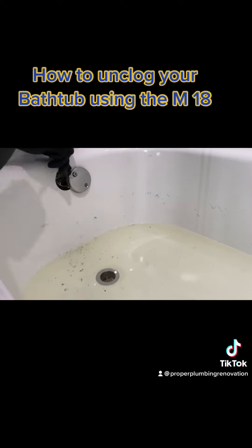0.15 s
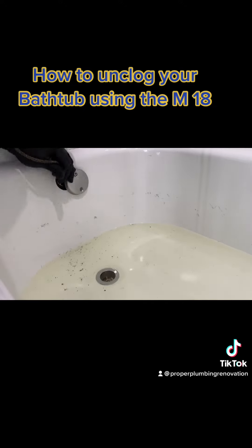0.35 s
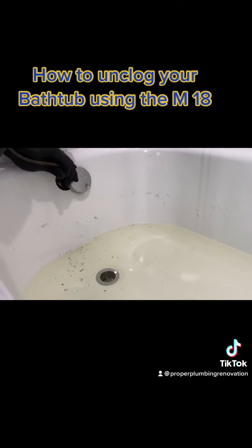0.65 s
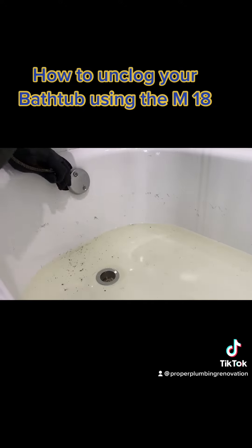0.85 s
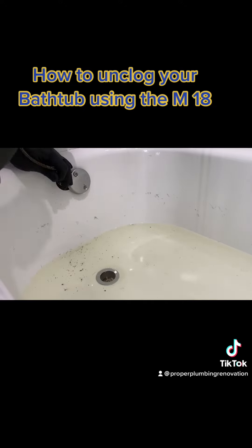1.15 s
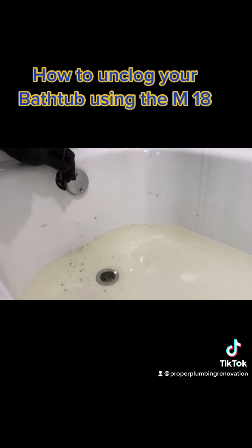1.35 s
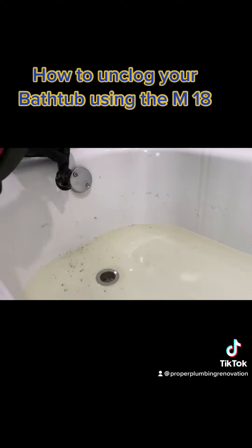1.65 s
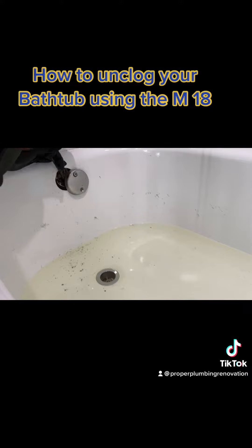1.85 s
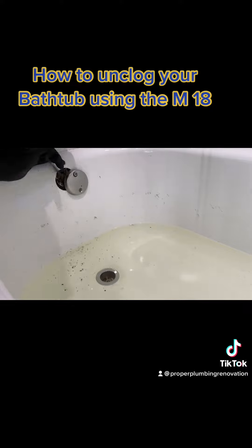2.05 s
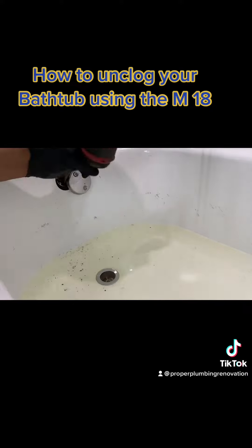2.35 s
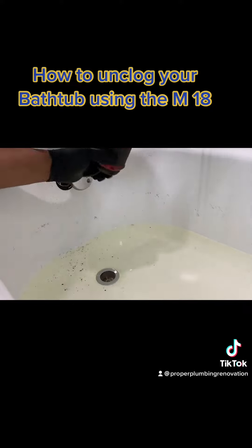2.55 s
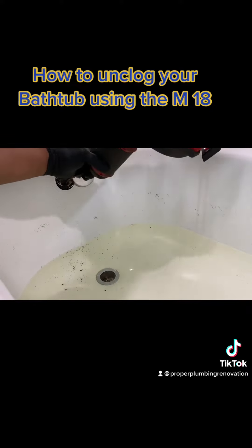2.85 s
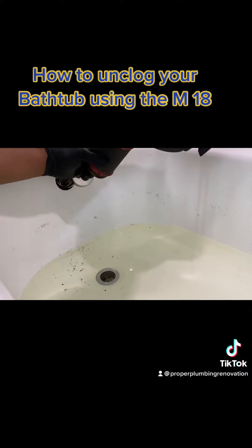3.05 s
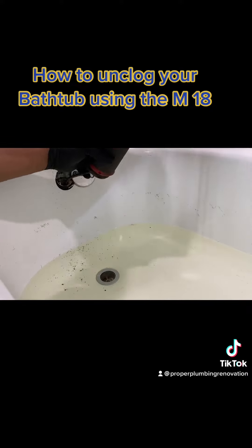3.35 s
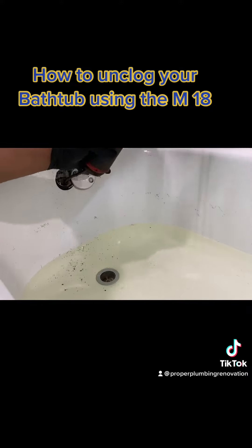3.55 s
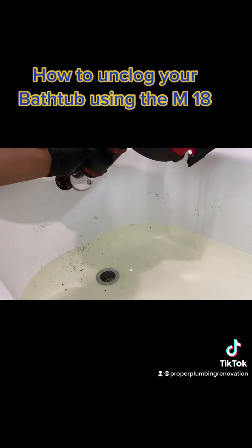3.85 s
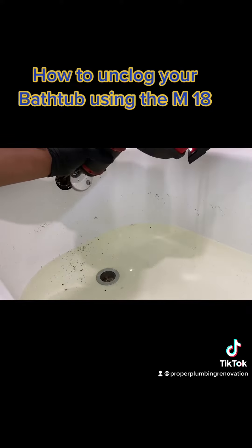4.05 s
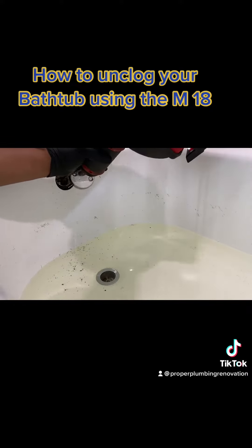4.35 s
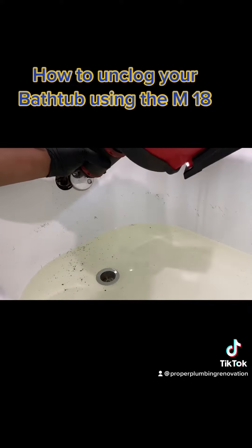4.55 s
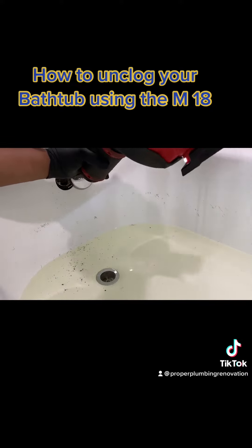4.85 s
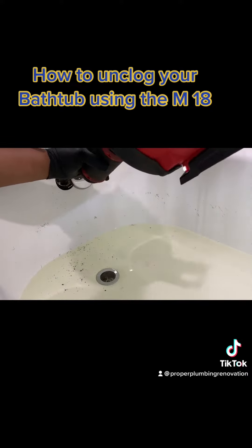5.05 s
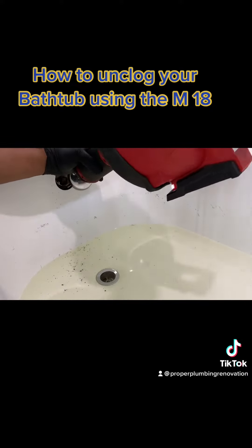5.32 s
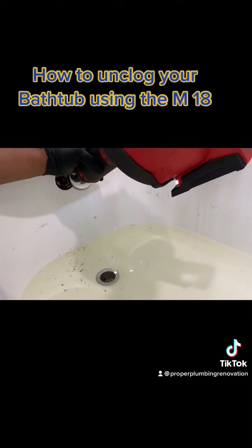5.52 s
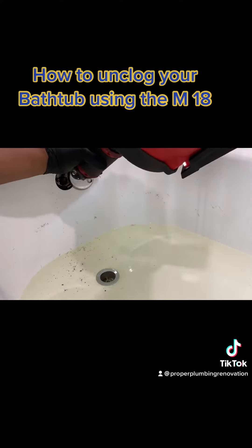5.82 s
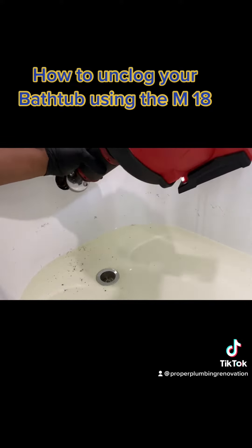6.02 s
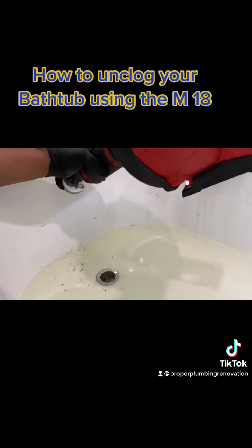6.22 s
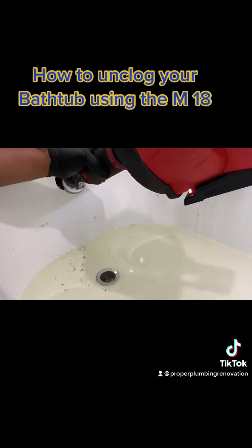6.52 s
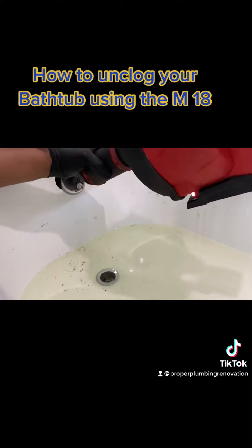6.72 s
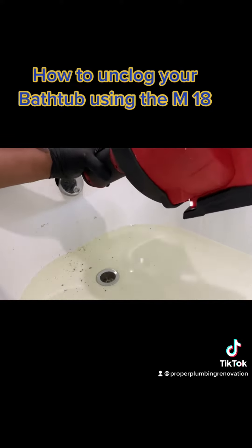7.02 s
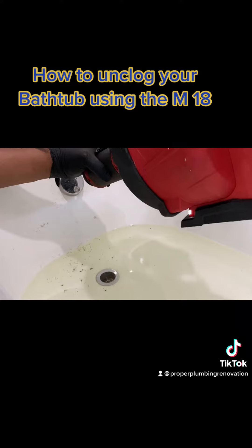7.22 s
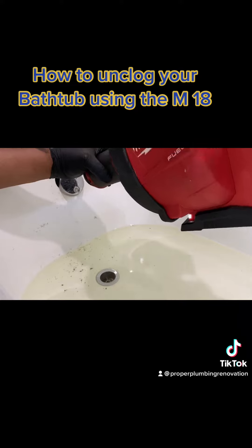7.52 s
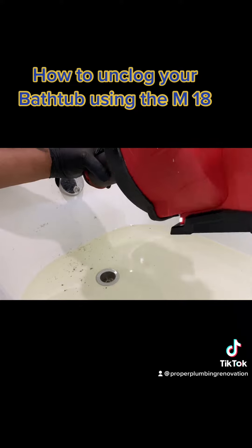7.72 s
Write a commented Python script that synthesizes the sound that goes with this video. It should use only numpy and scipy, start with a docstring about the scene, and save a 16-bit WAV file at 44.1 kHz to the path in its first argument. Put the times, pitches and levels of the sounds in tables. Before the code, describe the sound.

Close stereo microphones in a small hard bathroom. A drain cleaning machine coasts down and brakes, cable knocking in its plastic drum. A switch clicks, the motor spins up briefly, then coasts with rattles and stops. Quieter scrapes and knocks follow as cable is fed by hand. Another click, then a longer, louder burst with hum, gear whine and heavy thumping, a brake, and one last pull.

```python
"""A cordless drain machine over a bathtub coasts down from a burst and is braked, its cable knocking.
A switch clicks, the motor winds up for a short burst, coasts and is braked; then the cable is fed by hand.
After another click come a longer burst, brake and one last pull. Hum, whine, scrape and rumble follow
speed and torque; swarms of coil contacts shake the plastic drum and ring the steel cable.
Throughout, tub modes boom and a small hard room answers."""
import sys
import numpy as np
from scipy import signal
from scipy.fft import rfft, irfft
from scipy.io import wavfile
from scipy.ndimage import uniform_filter1d

SR = 44100
rng = np.random.default_rng(int(sys.argv[2]) if len(sys.argv) > 2 else 0)


def dump(signal):
    """Clip the signal to [-1, 1] and save it as 16-bit WAV at the path in sys.argv[1]."""
    limited = np.clip(np.atleast_2d(signal).T, -1, 1)
    pcm = np.round(limited * 32767).astype(np.int16)
    wavfile.write(sys.argv[1], SR, pcm)


N = 347508
TIME = np.arange(N) / SR
HZ = np.fft.rfftfreq(N, 1 / SR)
# All table levels are relative; t60 is the time to die by 60 dB.


def gain_of(db):
    """Amplitude factor of a level in dB."""
    return 10 ** (np.asarray(db) / 20)


def evened(x):
    """Signal scaled to rms 1."""
    return x / np.sqrt(np.mean(x ** 2) + 1e-20)


def read(points, hz):
    """Spectrum joined by straight lines on a log-frequency axis."""
    f, value = np.transpose(points)
    return np.interp(np.log(hz + 1), np.log(f + 1), value)


def curves(rows):
    """Each column of a table, sample by sample."""
    s, *columns = np.transpose(rows)
    return [np.interp(TIME, s, c) for c in columns]


def wander(rate_hz):
    """Slow noise of rms 1, low-passed near rate_hz."""
    noise = rfft(rng.standard_normal(N))
    return evened(irfft(noise / (1 + (HZ / rate_hz) ** 4), N))


def through(x, response):
    """Signal convolved with a response, cut to N samples."""
    return signal.oaconvolve(np.atleast_2d(x), np.atleast_2d(response), axes=1)[:, :N]


def body(colour, low_hz, high_hz, size=4096):
    """Minimum-phase response of energy 1 for one band of a spectrum."""
    hz = abs(np.fft.fftfreq(size, 1 / SR)) + 1
    band = np.sqrt((1 + (low_hz / hz) ** 6) * (1 + (hz / high_hz) ** 6))
    log_gain = np.log(np.maximum(gain_of(read(colour, hz)) / band, 1e-5))
    response = np.fft.ifft(np.exp(np.conj(signal.hilbert(log_gain)))).real[:size // 2]
    return response / np.linalg.norm(response)


def ringing(modes, scatter_turns=1):
    """Dying modes, each with the energy of its dB, at phases scattered between the ears."""
    t = np.arange(SR) / SR
    out = np.zeros((2, SR))
    for hz, db, t60 in modes:
        envelope = gain_of(db - 60 * t / t60) * np.sqrt(4 * np.log(1000) / (t60 * SR))
        out += envelope * np.sin(2 * np.pi * (hz * t + scatter_turns * rng.random((2, 1))))
    return out


def contacts(per_s, spread_db):
    """Tiny steel contacts of uneven size, evened to rms 1, with signs drawn for each ear."""
    size = gain_of(spread_db * np.minimum(rng.exponential(1, N), 3)) * (rng.random(N) < per_s / SR)
    hits = size * rng.choice([-1., 1.], (2, N))
    power = uniform_filter1d(np.mean(hits ** 2, 0), size=500)
    return hits / np.sqrt(abs(power) + 1e-6)


# background air spectrum: (frequency [Hz], density [dB per Hz])
AIR_COLOUR = [(20, -6.5), (60, 3.5), (170, -5), (400, -14.5), (1000, -14), (3000, -39.5), (8000, -44.5),
              (16000, -45)]


def air():
    """Steady coloured noise whose level wanders slowly."""
    noise = rng.standard_normal((2, N)) * gain_of(2 * wander(6.2))
    return gain_of(-50.5) * through(noise, body(AIR_COLOUR, 13, 18000))


# room decay: (frequency [Hz], t60 [s])
ROOM_T60 = [(100, 0.22), (400, 0.43), (1000, 0.28), (4000, 0.18), (8000, 0.19), (15000, 0.11)]


def room(x, gap_s=.004):
    """Dense reflections from close hard walls, even in colour, each band dying at its own speed."""
    taps = rng.standard_normal((2, SR)) * (rng.random((2, SR)) < 4000 / SR) * (TIME[:SR] > gap_s)
    hz, t, z = signal.stft(taps, SR, nperseg=256)
    decay = gain_of(-60 * t / read(ROOM_T60, hz)[:, None])
    tail = rfft(signal.istft(z * decay, SR, nperseg=256)[1], 2 * SR)
    colour = uniform_filter1d(uniform_filter1d(abs(tail) ** 2, size=100), size=100)
    return through(x, irfft(tail / np.sqrt(colour))[:, :SR])


# hollow modes of tub and drum:
# (frequency [Hz], peak gain machine high [dB], peak gain machine lowered [dB], t60 [s])
TUB_MODES = [(168.4, -8, -3, 0.08), (295, -8, 4, 0.22), (373, 9.5, -3.5, 0.11), (573, -7, -18, 0.066),
             (813, 1, -0.5, 0.017), (1087, -14, 3.5, 0.091)]
# drive of the tub boom: (time [s], level [dB])
TUB_DRIVE = [(0, -3.5), (1.4, -4.5), (3, -8.5), (5.25, 4), (5.8, -7), (6.5, 1), (7.15, 5), (7.88, -13)]
LOWERED_S = (1.4, 5.5)  # lowering starts, ends


def tub(x):
    """Resonances of the hollow tub, crossfading from the high set to the lowered set."""
    x = x * gain_of(curves(TUB_DRIVE)[0])
    t, out = TIME[:SR // 2], 0
    lowered = np.interp(TIME, LOWERED_S, [0, 1])
    for place, share in enumerate([1 - lowered, lowered]):
        modes = np.zeros(len(t))
        for hz, *db, t60 in TUB_MODES:
            envelope = gain_of(db[place] - 60 * t / t60) * 2 * np.log(1000) / (t60 * SR)
            modes += envelope * np.cos(2 * np.pi * hz * t)
        out = out + through(x * share, modes)
    return out


# switch clicks: (time [s], level [dB], snap above the ring [dB])
CLICKS = [(0.842, -22, -5.5), (1.016, -55, 11), (4.828, -10, -15), (5.514, -51, 7), (7.493, -56, 9.5)]
# plastic housing modes: (frequency [Hz], level [dB], t60 [s])
HOUSING_MODES = [(740, -14.5, 0.037), (1700, -11.5, 0.023), (1990, -13, 0.011), (2210, -9, 0.029),
                 (2630, -11, 0.022), (4100, -17, 0.03), (5100, -21, 0.012)]


def clicks(snap_s=0.003):
    """A switch snaps as a noise crack and the plastic housing rings for a moment."""
    push, snap = np.zeros((2, N))
    for s, db, snap_db in CLICKS:
        push[int(s * SR)] = gain_of(db)
        snap[int(s * SR)] = gain_of(db + snap_db)
    crack = rng.standard_normal((2, 1000)) * np.exp(-TIME[:1000] / snap_s)
    crack = through(snap, crack / np.linalg.norm(crack[0]))
    band = signal.butter(2, [600, 3800], "bandpass", fs=SR, output="sos")
    ring = signal.sosfilt(band, through(push, ringing(HOUSING_MODES, scatter_turns=.08)))
    return (ring + through(crack, body(KNOCK_COLOUR, 2500, 8400))) * gain_of([[18], [15]])


# short drum tones, as motor hum passes a resonance or a knock or braking rings on:
# (time [s], frequency [Hz], level [dB], t60 [s])
DRUM_TONES = [(1.454, 368, -23, 0.4), (1.654, 590, -25, 0.29), (2.776, 290.6, -37.5, 0.71),
              (5.801, 285, -16.5, 0.19), (5.812, 845, -17, 0.088), (6.732, 801, -16, 0.16),
              (7.191, 374, -24.5, 0.39), (7.745, 760, -23.5, 0.19)]


def drum_ring(rise_s=0.0024):
    """Short dying tones in the drum: hum passing a resonance, knocks or braking ringing on."""
    out = np.zeros(N)
    for s, hz, db, t60 in DRUM_TONES:
        t = np.maximum(TIME - s, 0)
        envelope = gain_of(db - 60 * t / t60) * (1 - np.exp(-t / rise_s))
        out += envelope * np.sin(2 * np.pi * hz * t)
    return out * gain_of(0.72 * wander(31))


# heavy coil thumps the machine or drops on the drum wall: (time [s], level [dB], pitch [Hz])
LURCHES = [(0.01, -36, 175), (0.096, -33, 175.5), (0.125, -34.5, 85), (0.321, -33.5, 81), (0.423, -41, 70),
           (0.515, -42, 90), (0.668, -42, 161), (0.73, -37, 65), (0.99, -43.5, 70), (1.228, -33, 170),
           (1.255, -38, 84), (1.325, -27, 74.5), (1.386, -35, 101), (1.64, -44, 111), (1.852, -38.5, 85),
           (1.953, -38, 90.5), (2.075, -45, 85), (2.115, -39.5, 170), (2.156, -37, 103), (2.222, -33, 165),
           (2.286, -34.5, 170), (2.311, -34.5, 90), (2.549, -40, 174), (2.669, -42.5, 179),
           (2.759, -38, 85), (2.765, -31, 179), (3.915, -41, 161), (3.929, -54, 80), (3.993, -50, 167),
           (4.26, -40, 166), (4.414, -48, 68.6), (4.539, -49, 65), (4.68, -49, 110), (5.312, -40.5, 160),
           (5.52, -41.5, 54.44), (5.572, -43, 175), (5.673, -37, 185), (5.708, -20.5, 239),
           (5.82, -33, 170), (5.96, -44.5, 109), (6.0, -22.5, 168), (6.11, -33.5, 138), (6.155, -34, 90),
           (6.2, -23, 178), (6.314, -37.5, 85), (6.333, -31, 156), (6.48, -33, 152), (6.554, -24, 157.4),
           (6.927, -36.5, 95), (6.944, -35.5, 168), (7.032, -37.5, 170), (7.149, -26, 163),
           (7.194, -27.5, 237), (7.831, -26, 168), (7.845, -35, 80)]


def lurches(swell_s=0.0088, blur_hz=18.72):
    """A dull thump of unsteady pitch swells and dies each time the weight of the coil shifts."""
    out = np.zeros(N)
    blur_turns = np.cumsum(blur_hz * wander(38)) / SR
    for (s, db, hz), start_turns in zip(LURCHES, rng.random(len(LURCHES))):
        part = slice(max(int(s * SR), 0), int(s * SR) + SR // 5)
        t = np.maximum(TIME[part] - s, 0)
        u = t / swell_s
        tone = np.sin(2 * np.pi * (hz * t + blur_turns[part] + start_turns))
        out[part] += gain_of(db) * u * np.exp(1 - u) * tone
    return out * gain_of(1.0)


# trigger pulls: (time [s], held [s], coasting time constant [s], coasts for [s],
#                 scrape [dB], rumble [dB], hum [dB], whine [dB])
BURSTS = [(-0.52, 0.44, 0.62, 0.89, 7, 0.5, 10.5, -10), (1.03, 0.31, 0.67, 1.7, 2, -1, 0.5, 0.5),
          (5.535, 1.165, 0.47, 0.53, 1.5, -9, 1, 2), (7.515, 0.61, 0.45, 1.1, -3, -4.5, 1, -4)]
TOP_HZ, SPIN_UP_HZ_PER_S = 310, 990  # shaft
BRAKE_S, SETTLE_S = 0.035, 0.1783  # time constants: braking, torque easing after the climb


def drive():
    """Shaft speed (1 = full), torque and each burst's own dB: rounded climb, hold, coast, brake."""
    speed, torque, own_db = np.zeros(N), np.zeros(N), np.zeros((4, N))
    climb_s = TOP_HZ / SPIN_UP_HZ_PER_S
    for s, held, coast, coasts_for, *db in BURSTS:
        on = TIME >= s
        t = TIME[on] - s
        slowing = np.maximum(t - held, 0) / coast
        slowing = slowing + np.maximum(t - held - coasts_for, 0) / BRAKE_S
        climb = t / climb_s / (1 + (t / climb_s) ** 12) ** (1 / 12)
        speed[on] = climb * np.exp(-slowing)
        torque[on] = np.exp(-np.maximum(t - climb_s, 0) / SETTLE_S)
        own_db[:, on] = np.array(db)[:, None]
    return speed, torque, own_db


def loudness(law, speed, torque):
    """Level in dB; law = (dB at full speed, dB per tenfold speed, extra dB under torque)."""
    full_db, tenfold_db, torque_db = law
    return full_db + tenfold_db * np.log10(speed + 1e-4) + torque_db * torque


# gear case modes rung by the teeth: (frequency [Hz], level [dB], t60 [s])
GRIND_MODES = [(803, 0.5, .028), (950, -10.5, 0.018), (1150, -16, 0.013), (1750, -6, 0.0066),
               (2700, -3, 0.0078)]
GRIND_LAW = (-54.5, 9, 16.3)


def grind(tooth_depth=0.3, flutter_db=3, mesh_order=8):
    """Gear teeth grind in uneven grains, louder under torque, and ring the case at its own pitches."""
    speed, torque, _ = drive()
    mesh = 1 + tooth_depth * np.sin(2 * np.pi * mesh_order * np.cumsum(TOP_HZ * speed) / SR)
    level = gain_of(loudness(GRIND_LAW, speed, torque) + flutter_db * wander(70))
    level = level * np.minimum(10 * speed, 1)
    return through(contacts(per_s=2500, spread_db=2.5) * mesh * level, ringing(GRIND_MODES))


# shaft hum lines: (multiple of the shaft, level [dB])
HUM_ORDERS = [(2, -16), (3, -2.5), (4, -17), (6, -17)]
# gear whine lines: (multiple of the shaft, level [dB])
GEAR_ORDERS = [(3, -11), (5, -10), (8, -8), (9, -11), (12, -12), (15, -11), (17, -5), (18, -12)]
# gear case lift of the passing whine: (frequency [Hz], gain [dB])
GEARCASE = [(230, -14.5), (420, 3.5), (600, 5.5), (800, -0.5), (1200, 4), (1600, -10), (2100, -8),
            (2600, 11), (3300, -1.5), (4400, 7), (4900, -10)]
HUM_LAW, WHINE_LAW = (-39.5, 32, 10.6), (-46, 22, 16.9)
# drum shakes near this shaft speed; shake dB is halved at full torque
CRITICAL_HZ, CRITICAL_WIDTH_HZ, SHAKE_DB = 236, 11, 5.6
TURN_S, HEAVY_AT_S, SWELL_DB = 0.217, 5.84, 7  # lopsided coil: drum turn, a crest, unbalance swing
WAVER, SURGE = 0.035, 0.025  # shares of speed at zero torque: cable drag, turn of the coil


def motor(wobble=0.00503, rough_db=3.5, gear_rough_db=2.0, hum_blur_hz=19, gear_blur_hz=70,
          unbalance_db=1):
    """Shaft hum and gear whine follow the speed; the whipping cable makes both unsteady."""
    speed, torque, (_, _, hum_db, whine_db) = drive()
    turn = np.cos(2 * np.pi * (TIME - HEAVY_AT_S) / TURN_S)
    drag = (1 - torque) * (WAVER * wander(6) + SURGE * speed * turn)
    shaft_hz = TOP_HZ * speed * (1 + drag)
    hum_db = hum_db + loudness(HUM_LAW, speed, torque)
    nearness = np.exp(-((TOP_HZ * speed - CRITICAL_HZ) / CRITICAL_WIDTH_HZ) ** 2)
    shake_db = SHAKE_DB * (1 - .5 * torque) * nearness
    whine_db = whine_db + loudness(WHINE_LAW, speed, torque)
    turns = np.cumsum(shaft_hz * (1 + wobble * wander(28.2))) / SR
    # unbalance: shakes the drum near full speed, swells with each turn of the coil
    rattle_turns = np.cumsum(hum_blur_hz * wander(60.6)) / SR
    shaking_db = hum_db + unbalance_db + SWELL_DB * turn - 2.4 * torque + rough_db * wander(25)
    out = gain_of(shaking_db) * speed ** 5 * np.sin(2 * np.pi * (turns + rattle_turns))
    for orders, level_db, blur_hz, flutter_db, in_case in (
            (HUM_ORDERS, hum_db + shake_db, hum_blur_hz, rough_db, False),
            (GEAR_ORDERS, whine_db, gear_blur_hz, gear_rough_db, True)):
        for multiple, db in orders:
            # backlash smears the high lines most
            play_turns = np.cumsum(blur_hz * np.sqrt(multiple / orders[-1][0]) * wander(147.0)) / SR
            case_db = read(GEARCASE, multiple * shaft_hz) if in_case else 0
            line_db = level_db + db + case_db + flutter_db * wander(91)
            out += gain_of(line_db) * np.sin(2 * np.pi * (multiple * turns + play_turns))
    return out


# low handling rumble and resting floor, present throughout, varying most between bursts:
# (time [s], level [dB])
HANDLING = [(2.6, -49), (2.85, -71.5), (3.2, -48.5), (3.6, -44), (4.05, -52), (4.6, -47), (5.3, -41),
            (5.65, -50), (7.4, -55)]
# rubs, pushed by hand or whipped on the pipe: (middle [s], half length to 1/e [s], scrape level [dB])
STROKES = [(0.432, 0.027, -32), (1.79, 0.22, -29), (2.27, 0.058, -52), (2.614, 0.077, -34.5),
           (3.306, 0.022, -40.5), (3.545, 0.036, -45), (3.74, 0.07, -42), (3.993, 0.033, -42.5),
           (4.805, 0.027, -39.5), (5.153, 0.1, -44), (5.624, 0.042, -36.5), (5.68, 0.057, -27.5),
           (5.862, 0.025, -36), (6.557, 0.24, -33.5)]
HANDLING_SCRAPE_DB = -7.5  # cable shifting in the drum, against the handling rumble
SCRAPE_LAW, RUMBLE_LAW = (-26.5, 24.3, 8.65), (-23, 30.1, -0.96)
CABLE_LAG_S = 0.06


def sliding():
    """Scrape and rumble in dB: drum drags cable, tumbling lags behind; handling and rubs add theirs."""
    speed, torque, (scrape_db, rumble_db, _, _) = drive()
    keep = np.exp(-1 / (CABLE_LAG_S * SR))
    lagged = signal.lfilter([1 - keep], [1, -keep], speed, zi=speed[:1])[0]
    cable = np.minimum(lagged, speed)
    handling = gain_of(curves(HANDLING)[0])
    pushes = handling * gain_of(HANDLING_SCRAPE_DB)
    for s, half_s, db in STROKES:
        pushes = pushes + gain_of(db) * np.exp(-((TIME - s) / half_s) ** 2)
    scrape = gain_of(loudness(SCRAPE_LAW, speed, torque) + scrape_db) + pushes
    rumble = gain_of(loudness(RUMBLE_LAW, cable, torque) + rumble_db) + handling
    return 20 * np.log10([scrape, rumble])


# scrape spectrum: (frequency [Hz], density [dB per Hz])
SCRAPE_COLOUR = [(25, -13.5), (65, -7.5), (110, -1.5), (170, 4), (250, -1), (360, -1), (450, 0.5), (800, 0),
                 (1900, -9.5), (2600, -3), (4500, -3.5), (8000, -5), (12000, -16.5), (15500, -32.5)]
LUMPS_AT_REST = 0.95  # share of the lump depth left at standstill


def slide(flutter_db=4.0, lump_db=5.0, tooth_depth=0.032, brightening=0.44):
    """Coils scrape the drum wall, pulsing with the shaft, and tumble in lumps; harder is brighter."""
    scrape_db, rumble_db = sliding()
    speed = drive()[0]
    turns = np.cumsum(TOP_HZ * speed) / SR
    lump_db = lump_db * (LUMPS_AT_REST + (1 - LUMPS_AT_REST) * speed)
    grit = contacts(per_s=7000, spread_db=0.5) * (1 + tooth_depth * np.sin(2 * np.pi * turns))
    grit = grit * gain_of(flutter_db * wander(27))
    tumble_db = rumble_db - 8.5 + lump_db * np.minimum(wander(21), 1) - 0.39 * curves(TUB_DRIVE)[0]
    rumble = through(grit * gain_of(tumble_db), body(SCRAPE_COLOUR, 27, 433))
    scrape = through(grit * gain_of(scrape_db - 10.5), body(SCRAPE_COLOUR, 506, 3600))
    fizz = grit * gain_of(scrape_db - 19.0 + brightening * (scrape_db + 16.0))
    return rumble + scrape + through(fizz, body(SCRAPE_COLOUR, 5700, 19000))


def ticks(per_s=45, level_db=10, spread_db=5):
    """Single coils tick on the spinning drum, at a rate that follows its speed."""
    size = gain_of(level_db + sliding()[0] + spread_db * rng.uniform(-1.2, 1, N))
    struck = rng.random(N) < per_s * drive()[0] / SR
    taps = size * struck * rng.uniform(0.27, 1, (2, N))
    return through(taps, body(KNOCK_COLOUR, 700, 5400))


# cable knocks and rattles: (time [s], level [dB], swell [s], hardness [dB], high = steel on steel)
KNOCKS = [(0.01, -24, 0.014, -11), (0.098, -18, 0.0059, -8.5), (0.16, -21, 0.0079, -4.5),
          (0.181, -30.5, 0.0083, 10.5), (0.271, -21.5, 0.0029, -8.5), (0.346, -24, 0.0072, -4.5),
          (0.415, -28, 0.0054, -10), (0.485, -22, 0.015, -2), (0.667, -29.5, 0.003, -7),
          (0.71, -23, 0.016, -6), (0.755, -29, 0.0044, 4), (0.839, -33, 0.00072, -1),
          (1.038, -46, 0.0084, -14), (1.281, -31, 0.0077, -23), (1.324, -26.5, 0.0087, -5),
          (1.355, -27, 0.005, 5), (1.387, -32, 0.0064, 4.5), (1.402, -21.5, 0.0018, 6),
          (1.454, -35, 0.0077, 10), (1.517, -23.5, 0.0055, 2), (1.581, -32.5, .016, 4.5),
          (1.623, -33, 0.01, -7), (1.654, -30.5, 0.0073, 6.5), (1.719, -21.5, 0.0042, 1.5),
          (1.786, -44, 0.0099, 2), (1.815, -29.5, 0.005, -5), (1.858, -45, 0.0065, 2),
          (1.932, -33, 0.015, -5.5), (1.966, -28.5, 0.0081, -9), (2.078, -32, 0.006, -7),
          (2.124, -24.5, 0.0065, -3), (2.159, -27.5, 0.0055, 3.5), (2.226, -25, 0.0066, -0.5),
          (2.252, -35.5, 0.013, 3), (2.29, -27, 0.0076, -1), (2.325, -41, 0.0049, 11.5),
          (2.383, -32, 0.008, 2), (2.436, -27, 0.0034, 0.5), (2.495, -41, 0.014, -18),
          (2.553, -28, 0.0036, -4), (2.581, -32.5, 0.0033, 3.5), (2.666, -33.5, 0.004, 7.5),
          (2.69, -38.5, 0.0017, -7), (2.71, -26.5, 0.0034, -3.5), (2.74, -23.5, 0.0088, 0),
          (2.776, -16.5, 0.004, -0.5), (2.895, -33, 0.0069, -8.5), (2.974, -43, 0.0071, -13),
          (3.136, -44.5, 0.0035, -1), (3.343, -49.5, 0.0072, -1), (3.439, -25, 0.0089, -6.5),
          (3.491, -37, 0.014, -9.5), (3.617, -22, 0.012, -3), (3.702, -27.5, 0.0047, -5.5),
          (3.917, -38, 0.015, -6), (4.132, -49, 0.034, -11), (4.257, -46.5, 0.0086, -16.5),
          (4.323, -41, 0.011, -22), (4.48, -46, 0.013, -19.5), (4.57, -37, 0.013, -4.5),
          (4.687, -43, 0.0018, -5), (4.724, -32.5, 0.0023, -6.5), (4.851, -33.5, 0.0035, -7),
          (4.895, -38.5, 0.003, -7.5), (4.947, -37, 0.012, -15.5), (5.032, -36.5, 0.0027, -11.5),
          (5.063, -42, 0.01, -13), (5.259, -38.5, 0.016, -11), (5.316, -21.5, 0.012, -3.5),
          (5.544, -36.5, 0.0071, -15.5), (5.719, -15, 0.0027, -6), (5.801, -12, 0.002, -7),
          (5.836, -15.5, 0.006, -5.5), (5.863, -24.5, 0.0073, 5), (5.935, -15.5, 0.0079, -4.5),
          (6.004, -21, 0.0078, -5), (6.053, -18.5, 0.0044, -6.5), (6.124, -22.5, 0.0072, -9.5),
          (6.173, -23, .007, -9.5), (6.203, -26, 0.011, -7.5), (6.331, -20.5, 0.01, -9.5),
          (6.561, -16, 0.0052, -7.5), (6.681, -25, 0.0027, -3.5), (6.736, -18, 0.008, -4.5),
          (6.888, -25, 0.021, -7), (6.936, -15, 0.0065, -6.5), (7.03, -25, 0.018, -6.5),
          (7.118, -31.5, 0.013, -18), (7.157, -20, 0.0097, -6), (7.313, -48.5, 0.0038, -11),
          (7.494, -54, 0.013, -5.5), (7.862, -18.5, 0.0078, -9)]
# knock spectrum, also of ticks and switch snaps: (frequency [Hz], density [dB per Hz])
KNOCK_COLOUR = [(30, -20), (110, -10.5), (180, -3), (250, -6), (360, -4), (440, -12), (540, 0), (1000, 3.5),
                (1600, 5), (3000, -2), (7000, -4), (9000, -4), (12000, -14.5), (13500, -21.5), (15500, -17)]
# steel cable modes: (frequency [Hz], level [dB], t60 [s])
STEEL_MODES = [(1180, -8, .025), (1480, -6, .025), (1640, -4, .025), (1900, -6, .015), (2250, -6, .025),
               (2900, -4, .03), (2960, -3, .04), (3220, -7, .02), (3515, -7, .03), (3760, -8, .015),
               (4037, -7, .03), (4150, -4.5, .06), (4400, -9, .015), (4640, -6, .08), (5050, -11, .015),
               (5475, -9.5, .09), (5739, -13, .08), (5897, -8.5, .1), (6230, -14, .06), (6536, -11.5, .11),
               (7117, -16, .07), (8010, -10, .06), (8845, -9, .1), (9300, -13, .08), (10210, -13, .07),
               (10940, -14, .06), (11900, -14, .06)]
# steel ring, less once the cable is gripped and fed into the pipe: (time [s], level [dB])
STEEL_RING = [(0, -17.5), (2.6, -13.5), (2.78, -20.5), (5.5, -18), (7.88, -27)]
THUD_DB, THUD_SPIN_DB = -5, 3  # bass of a knock: at rest, extra at full speed
THUD_PER_HARDNESS, RING_PER_HARDNESS = -0.25, 0.92  # dB per dB


def knocks(glance=0.16, rattle_db=1, bite=1.135, lead_in=0.17, strike_db=7.0):
    """Each knock is a swarm of coil contacts that swells and dies; it shakes drum and rings cable."""
    swarm = contacts(per_s=3200, spread_db=2.0) * gain_of(rattle_db * wander(90))
    bands_hz = [(38, 476), (566, 4820), (8100, 22000)]
    parts = [body(KNOCK_COLOUR, low, high) for low, high in bands_hz]
    steps = np.arange(SR // 4)
    steel = np.array([ringing([mode])[:, :SR // 4] for mode in STEEL_MODES])
    strikes = gain_of(strike_db * rng.uniform(-1.3, 1, (len(KNOCKS), len(STEEL_MODES))))
    spots = rng.uniform(-0.88, 1, (len(KNOCKS), 3, 2))
    trim_db = np.array([-3.0, -1.83, -1.0, 18.0])  # thud, clack, crash, ring
    speed = drive()[0]
    out = np.zeros((2, N))
    for (s, db, swell, hard_db), strike, spot in zip(KNOCKS, strikes, spots):
        # soft knocks and a fast drum thud more; hard knocks crash and ring more
        bass_db = THUD_DB + THUD_SPIN_DB * np.interp(s, TIME, speed) + THUD_PER_HARDNESS * hard_db
        ring_db = np.interp(s, *np.transpose(STEEL_RING)) + RING_PER_HARDNESS * hard_db
        part = slice(max(int(s * SR) - SR // 50, 0), int(s * SR) + SR // 5)
        u = (TIME[part] - s) / max(swell, 1e-4)
        after = np.maximum(u, 0)
        # first coils graze the wall before the rest arrive
        shape = (after * np.exp(1 - after)) ** bite + lead_in * np.exp(-abs(u))
        # each spot on the drum adds its own short echoes, hence colour
        hit = swarm[:, part]
        echoes = sum(np.sign(side) * np.roll(hit, int(abs(path) * SR / 700) + 8, 1)
                     for side, path in spot)
        hit = hit + glance * echoes
        # each place on the cable favours other modes; bending shifts the ring a little
        bent_steps = steps * (1 + .005 * spot[0, 1])
        ring = [np.interp(bent_steps, steps, ear) for ear in np.tensordot(strike, steel, 1)]
        levels_db = db + trim_db + [bass_db, 0, hard_db, ring_db]
        for response, level_db in zip(parts + [ring], levels_db):
            sound = through(hit * shape, response)[:, :len(u)]
            out[:, part] += gain_of(level_db) * evened(sound) * np.sqrt(np.mean(shape ** 2))
    return out


def scene():
    """Machine, tub boom and room echoes, with the drier switches, drum tones and air."""
    machine = knocks() + slide() + lurches() + ticks() + grind() + motor() * gain_of([[-1], [-3]])
    machine = machine + tub(machine)
    # two room tails slowly alternate, so no single reflection pattern dominates
    turning = 2 * np.pi * 0.6056 * TIME
    echoes = room(machine * np.cos(turning)) + room(machine * np.sin(turning))
    switches = clicks()  # near the microphones, so drier
    out = gain_of(-1.0) * machine + gain_of(-5.0) * echoes
    out = out + gain_of(-3.0) * switches + gain_of(-9.0) * room(switches)
    return out + drum_ring() + air()


# left-right likeness: (frequency [Hz], correlation)
LIKENESS = [(50, 0.59), (200, 0.47), (400, 0.0064), (800, -0.067), (3000, 0.2), (5500, 0.06), (7000, 0.81),
            (9000, -0.89), (11200, 0.66), (13200, -0.61), (15000, 0.9)]
# left minus right: (frequency [Hz], level [dB])
LEFT_LEAN = [(50, 6), (200, 1.5), (700, 2), (2500, 3), (5000, 3), (9000, -0.5)]
EDGE_HZ = 15900


def record(dry):
    """Two close microphones, the left nearer, mix by band; peaks are rounded, then band-limited."""
    a, b = rfft(dry)
    angle = np.arcsin(np.clip(read(LIKENESS, HZ), -1, 1)) / 2
    lean = gain_of(read(LEFT_LEAN, HZ) / 2)
    left = (a * np.cos(angle) + b * np.sin(angle)) * lean
    right = (b * np.cos(angle) + a * np.sin(angle)) / lean
    pair = irfft(np.array([left, right]), N)
    pair = pair / (1 + (pair / .75) ** 4) ** .25
    low_pass = signal.firwin(511, EDGE_HZ, window=("kaiser", 9), fs=SR)
    return signal.oaconvolve(pair, low_pass[None], "same")


dry = scene()
out = record(dry)
dump(out)
```